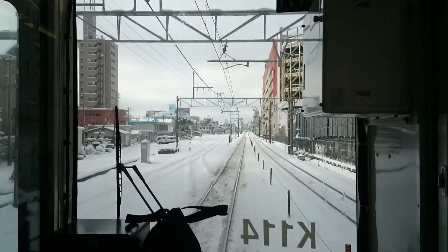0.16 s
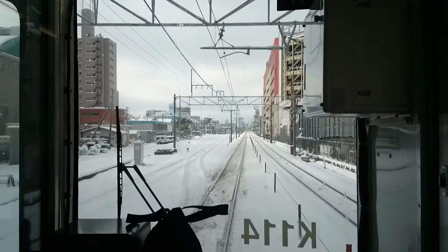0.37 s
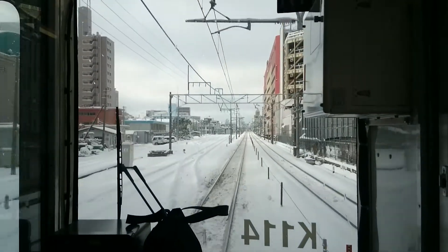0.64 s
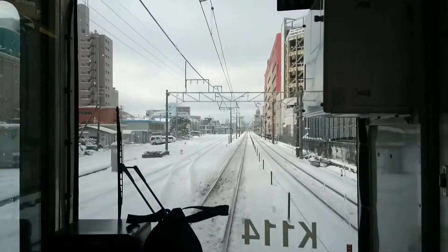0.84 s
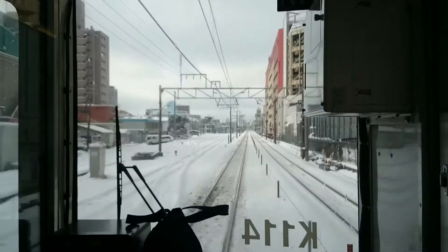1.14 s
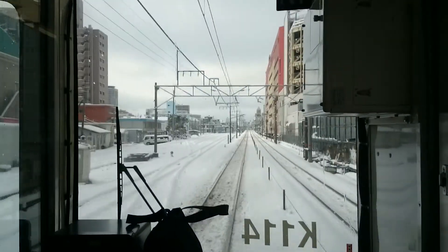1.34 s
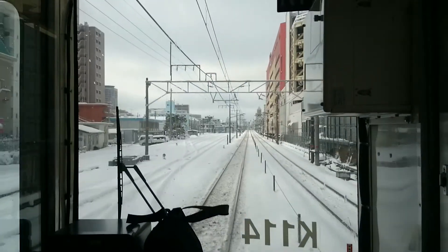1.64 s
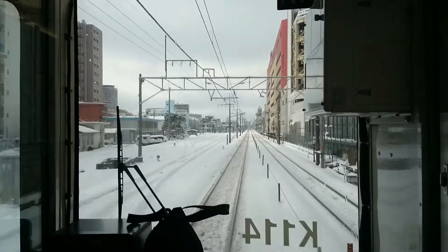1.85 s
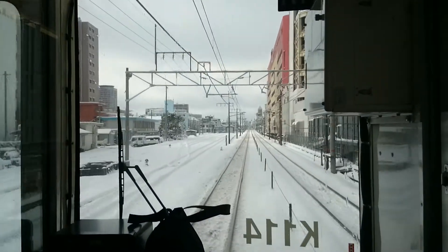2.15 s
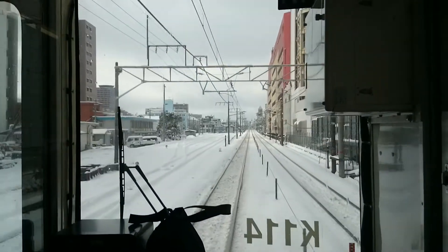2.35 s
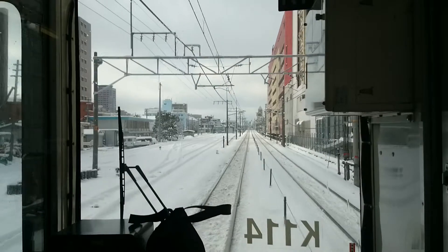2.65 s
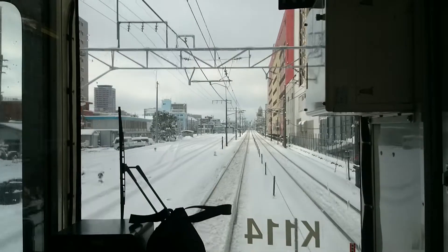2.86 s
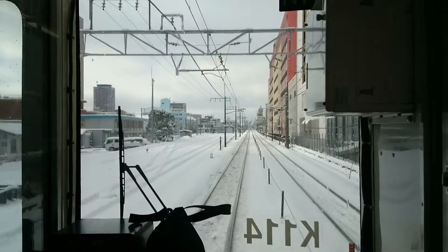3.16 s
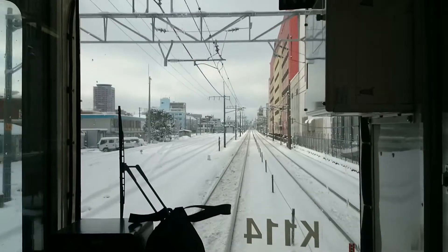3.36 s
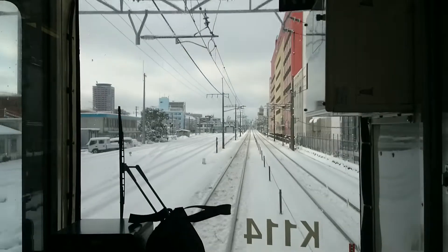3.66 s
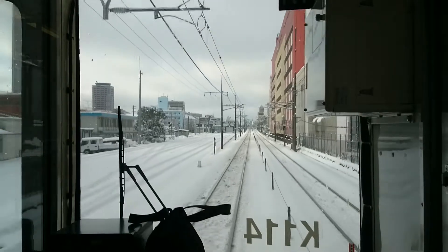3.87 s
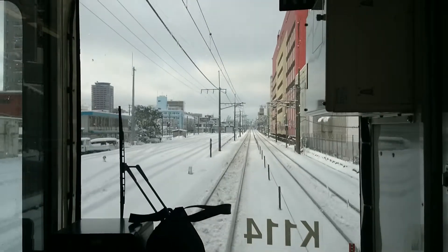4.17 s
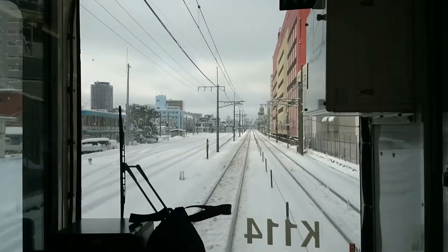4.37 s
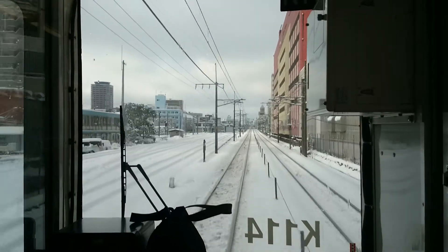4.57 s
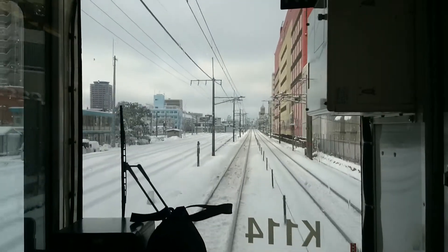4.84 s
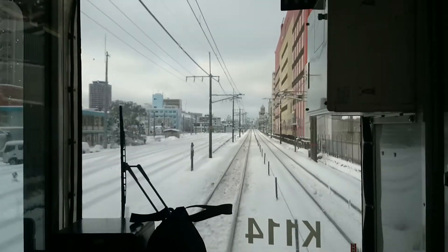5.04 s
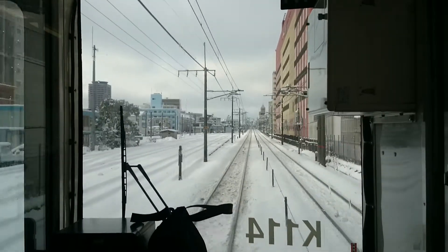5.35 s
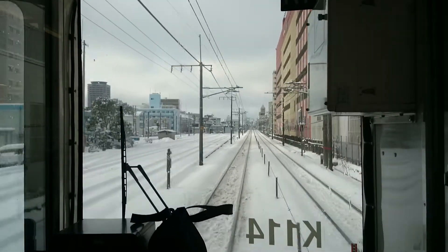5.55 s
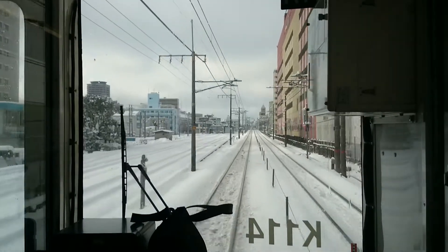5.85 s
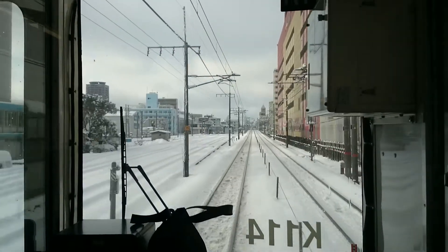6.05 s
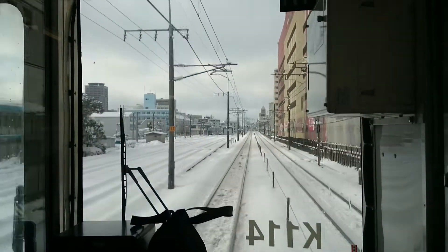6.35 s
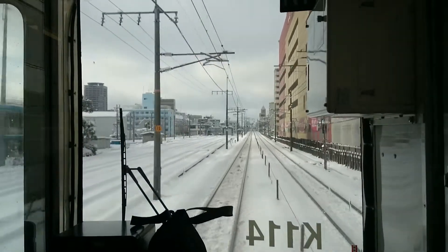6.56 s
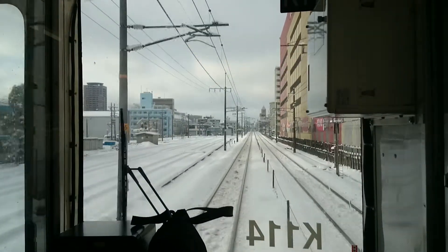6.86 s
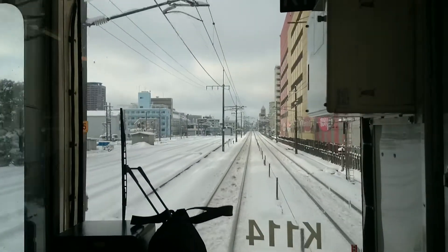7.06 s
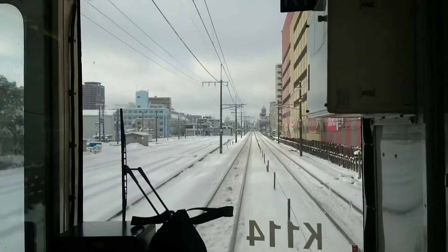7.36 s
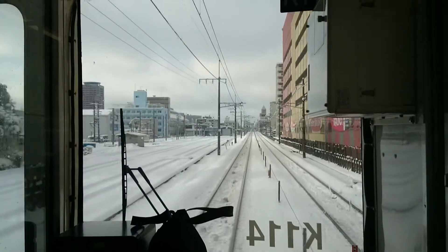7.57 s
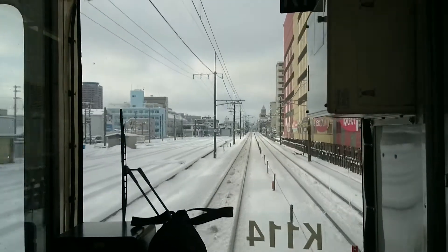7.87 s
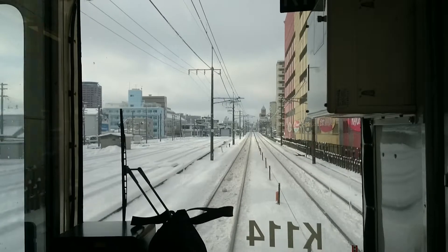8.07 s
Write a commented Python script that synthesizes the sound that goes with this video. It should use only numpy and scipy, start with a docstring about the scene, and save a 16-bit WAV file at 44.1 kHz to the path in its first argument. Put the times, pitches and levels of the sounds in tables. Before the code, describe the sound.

Inside the front of a moving electric train, low booming rumble and steady rolling noise, with irregular dull knocks and clacks from wheels crossing rail joints.

```python
"""A rumbling, knocking ride inside the front of an electric train on jointed, snowy track, in two ports.
A wavering slow sine bounces the car body and shaped noise booms in the cabin; rough rail drives noise
through floor and wheel resonances; axles over joints ring pitched floor modes and crack on the wheels.
Puffs and one swell of grainy hiss lean to the right; a few faint squeaks are short, wobbling sines."""
import sys
import numpy as np
from scipy import signal
from scipy.fft import rfft, irfft, next_fast_len
from scipy.io import wavfile
from scipy.ndimage import uniform_filter1d

SR = 44100
rng = np.random.default_rng(int(sys.argv[2]) if len(sys.argv) > 2 else 0)


def put_to_file(sound):
    """Save the sound as 16-bit audio at rate SR, in the file named by the first command-line argument."""
    columns = np.atleast_2d(sound).T  # one column per channel
    safe = np.clip(columns, -1, 1)
    whole_steps = np.round(safe * 32767)
    wavfile.write(sys.argv[1], SR, whole_steps.astype(np.int16))


def boost(x):
    """Linear amplitude factor 10**(x/20) for a level x in decibels (scalar or array-like)."""
    u = np.asarray(x, float) / 20
    return 10 ** u


N = 362061
T = np.arange(N) / SR
SIZE = next_fast_len(N + SR)
HZ = np.fft.rfftfreq(SIZE, 1 / SR)
SWELL_TOP_S = 2.945  # the long hiss swell reaches its top; the wheels sing louder around it

# Axles over joints and points. Each row: start in seconds, thud level in dB, thud pitch in Hz, hardness in dB.
KNOCKS = [(0.001, -20.5, 284, 10), (0.016, -24, 394, 0), (0.292, -43.5, 465, -4), (0.392, -41, 330, 15),
          (0.621, -40.5, 372, 3), (0.732, -37, 280, 1.5), (0.932, -38, 249, 9), (1.108, -42.5, 229, -11),
          (1.186, -37.5, 267, 3), (1.521, -30, 252, 3.5), (1.684, -20, 279, -7), (1.941, -26, 252, 1.5),
          (1.953, -30, 315, 3), (2.003, -31.5, 210, -5), (2.091, -28, 299, 0), (2.149, -30.5, 224, -9),
          (2.207, -34.5, 230, -5), (2.272, -30, 320, 9), (2.29, -34.5, 421, 0.5), (2.395, -36.5, 393, -3.5),
          (2.518, -37.5, 357, 7), (2.706, -37.5, 305, 7), (3.745, -30.5, 290, 2), (3.872, -29.5, 294, -2),
          (4.281, -24, 264, -8.5), (4.315, -30.5, 256, -2), (4.37, -33.5, 254, -10),
          (4.412, -22, 262, -5.5), (4.5, -36.5, 293, -5.5), (4.805, -42.5, 272, -1),
          (5.349, -30.5, 275, -11), (5.485, -36.5, 413, 6.5), (5.868, -32, 269, -12),
          (5.986, -33, 294, -15), (6.062, -21.5, 267, 12), (6.092, -31, 283, 7), (6.198, -17, 287.4, 11.5),
          (6.235, -25, 282, -7), (6.402, -33, 277, 6.5), (6.494, -33, 486, -2.5), (6.962, -28.5, 326, 1),
          (7.092, -33, 277, 0.5), (7.301, -35.5, 372, 1), (7.36, -37, 308, 9.5), (7.78, -39, 296, 7),
          (7.916, -29, 291, -5.5)]


def evened(x):
    """Scales to rms 1."""
    return x / np.sqrt(np.mean(abs(x) ** 2) + 1e-20)


def spectrum(points):
    """Interpolates a table over log frequency on the FFT grid."""
    hz, value = np.transpose(points)
    return np.interp(np.log(HZ + 1), np.log(hz + 1), value)


def curve(rows, column):
    """Interpolates one column of a control table, sample by sample."""
    rows = np.array(rows)
    return np.interp(T, rows[:, 0], rows[:, column])


def through(drive, response):
    """Filters the drive by a response scaled to unit noise gain."""
    return irfft(rfft(drive, SIZE) * evened(response), SIZE)[..., :N]


def bursts(starts_s, levels_db, t60_s, rise_s):
    """Envelope of events that rise fast and die exponentially."""
    out = np.zeros(N + SR)
    t = T[:SR // 2]
    shape = boost(-60 * t / t60_s) * (1 - np.exp(-t / rise_s))
    for start_s, level_db in zip(starts_s, levels_db):
        first = round(max(start_s, 0) * SR)
        out[first:first + len(t)] += boost(level_db) * shape
    return out[:N]


def body():
    """Wavering sine bounce and noise boom, jolted by joints; the vented left port loses slow pressure."""
    # Each row: time in seconds, bounce level in dB, boom level in dB.
    motion = [(0.0, -27, -17), (0.2, -28.5, -28.5), (0.71, -38, -33.5), (1.07, -19, -28), (1.32, -16, -27),
              (1.85, -26, -28.5), (2.0, -35, -23), (2.33, -23, -27), (2.75, -32, -32), (2.97, -25, -22),
              (3.45, -53, -26.5), (3.86, -18.5, -28.5), (4.35, -29, -33), (4.89, -19, -24.5),
              (5.44, -24.5, -27), (6.06, -24, -27.5), (6.3, -24, -23.5), (6.72, -27.5, -27.5),
              (7.29, -17.5, -24), (7.73, -24.5, -29.5), (8.21, -39, -25)]
    # Boom spectrum. Each row: frequency in Hz, level in dB.
    boom_shape = [(2, -4), (8, 1.5), (14, 3.5), (20, 0.5), (29, -9), (40, -12), (65, -18.5), (110, -27.5),
                  (170, -39.5), (300, -73.5), (900, -140)]
    bounce_hz, waver_share = 3.5, 0.076
    jolt_db, jolt_t60_s = -11.5, 0.34
    left_vent_hz = 45
    waver = uniform_filter1d(uniform_filter1d(rng.standard_normal(N), 9000), 9000)
    pitch_hz = bounce_hz * (1 + waver_share * evened(waver))
    bounce = np.sqrt(2) * np.sin(2 * np.pi * np.cumsum(pitch_hz) / SR)
    boom = evened(through(rng.standard_normal(N), boost(spectrum(boom_shape))))
    starts_s, thud_db = np.transpose(KNOCKS)[:2]
    jolts = bursts(starts_s, thud_db + jolt_db, jolt_t60_s, rise_s=0.037)
    pressure = boost(curve(motion, 1)) * bounce + (boost(curve(motion, 2)) + jolts) * boom
    right = rfft(pressure, SIZE)
    vent = 1j * HZ / (left_vent_hz + 1j * HZ)
    return irfft(np.array([vent * right, right]), SIZE)[:, :N]


def rail_lumps():
    """Small random bumps of the rail, each a soft decaying pulse, as one envelope of rms 1."""
    bumps_per_s, t60_s, rise_s = 90, 0.11, 0.011
    bumps = (rng.random(N) < bumps_per_s / SR) * np.minimum(rng.exponential(1, N), 2.5)
    t = T[:SR // 4]
    bump = boost(-60 * t / t60_s) * (1 - np.exp(-t / rise_s))
    return evened(signal.oaconvolve(bumps, bump)[:N])


def wheel_response():
    """Causal wheel and rail resonances, alternating in sign, over a broad rail spectrum."""
    # Wheel and rail modes. Each row: frequency in Hz, width in Hz, level in dB.
    wheel_modes = [(786.3, 35, 0), (1114, 46, 2), (1385, 40, -2.5), (1463, 31.6, 1), (1947.4, 38, -1.5),
                   (1971.5, 30.5, 3), (2052, 57, -7), (2660, 27, -1.5), (2816, 60, -5.5), (3330, 23, -6),
                   (3820, 90, -20), (4530, 31, -11), (5390, 76, -26)]
    # Broad rail sound. Each row: frequency in Hz, level in dB.
    rail_shape = [(500, -19.5), (900, -8.5), (1700, -11.5), (2400, -14.5), (3100, -18.5), (4100, -20.5),
                  (7000, -35.5), (16000, -42)]
    response = boost(spectrum(rail_shape)).astype(complex)
    for k, (hz, width_hz, db) in enumerate(wheel_modes):
        response += (-1) ** k * boost(db) / (1 + 2j * (HZ - hz) / width_hz)
    return response


def patchy(pair, spread_db):
    """Level wanders apart from band to band, in patches about 250 Hz by 90 ms, alike in both ports."""
    z = signal.stft(pair, nperseg=1024, noverlap=768)[2]
    field = uniform_filter1d(rng.standard_normal(z.shape[1:]), size=6, axis=0)
    field = evened(uniform_filter1d(field, size=16, axis=1))
    return signal.istft(z * evened(boost(spread_db * field)), nperseg=1024, noverlap=768)[1][:, :N]


def rolling_and_singing(noise, wheel):
    """Rail roughness drives noise through the floor, and in part through the wheel modes."""
    # Each row: time in seconds, rail roughness in dB.
    roughness = [(0.0, -42), (0.46, -46), (1.95, -42), (2.12, -37), (2.52, -47.5), (3.16, -46), (4.18, -45),
                 (4.34, -46.5), (4.6, -46.5), (5.51, -47.5), (5.9, -44), (6.72, -44), (7.25, -43.5),
                 (7.66, -44.5), (8.21, -44)]
    # Floor spectrum. Each row: frequency in Hz, level in dB.
    floor_shape = [(60, -36.5), (120, -10.5), (170, -9.5), (285, -3), (400, -3), (550, -6.5), (800, -14),
                   (1200, -25.5), (2500, -31), (5000, -60.5), (12000, -110)]
    floor_lump_db, wheel_lump_db = -8.5, -19.5
    sing_db, sing_at_rough_db, sing_follow = -51.5, -45.5, 0.6
    swell_sing_db, swell_sing_s = 5.5, 0.26
    lumps = rail_lumps()
    rough_db = curve(roughness, 1)
    rough = boost(rough_db) * evened(1 + boost(floor_lump_db) * lumps)
    level_db = sing_db + sing_follow * (rough_db - sing_at_rough_db)
    level_db += swell_sing_db * np.exp(-((T - SWELL_TOP_S) / swell_sing_s) ** 2)
    sing = boost(level_db) * evened(1 + boost(wheel_lump_db) * lumps)
    rolling = through(rough * noise[:2], boost(spectrum(floor_shape)))
    return patchy(rolling + through(sing * noise[2:], wheel), spread_db=1.7)


def thuds():
    """Each joint gives a soft blow and a dying shake that ring the floor at the pitch of that spot."""
    # Floor modes over the bogie. Each row: multiple of thud pitch, width in Hz, level in dB.
    floor_modes = [(.47, 47, -21.5), (.8, 48.8, -13.5), (1.005, 45, 9.5), (1.302, 51.7, 8.5),
                   (1.6, 77, 10.5), (2.048, 85.6, -7), (2.597, 119, -2.5)]
    upper_db, upper_follow = -12, 0.73  # harder joints raise the upper modes
    shake_t60_s = 0.34
    # share of clean blow: strong, soft joints thud cleanly, hard ones rattle
    clean_share, clean_at_db, clean_per_db, clean_per_hard_db = .38, -30, .017, -.016
    out = np.zeros((2, N + SR))
    t = T[:SR // 2]
    for start_s, db, hz, hard_db in KNOCKS:
        ring = np.zeros(len(t))
        for ratio, width_hz, mode_db in floor_modes:
            if ratio > 1.2:
                mode_db = mode_db + upper_db + upper_follow * hard_db
            decay = np.exp(-np.pi * width_hz * t) * width_hz
            ring += boost(mode_db) * decay * np.sin(2 * np.pi * ratio * hz * t)
        # the springs smooth the blow to a few swings
        swings = np.exp(-((t - .011) / 0.012) ** 2) * np.cos(2 * np.pi * hz * t)
        blow = signal.fftconvolve(swings, ring)[:len(t)]
        shake = boost(-60 * t / shake_t60_s) * (1 - np.exp(-t / 0.004)) * rng.standard_normal((2, len(t)))
        shake = signal.fftconvolve(shake, ring[None] / np.linalg.norm(ring), axes=1)[:, :len(t)]
        clean = clean_share + clean_per_db * (db - clean_at_db) + clean_per_hard_db * hard_db
        clean = np.clip(clean, 0, 1)
        first = round(start_s * SR)
        out[:, first:first + len(t)] += boost(db) * (clean * blow / abs(blow).max() + (1 - clean) * shake)
    return out[:, SR // 100:][:, :N]  # all 10 ms earlier, as the swings build up first


def clacks(noise, wheel):
    """Each joint strikes the wheel modes with one sharp steel contact and a burst of noise."""
    # A blow excites the wheel unlike rolling. Each row: frequency in Hz, level in dB.
    clack_shape = [(600, -1), (1500, 2.5), (3000, -3), (6000, 0), (12000, 5)]
    ring_db, ring_t60_s = -18, .2
    crack_s = .00016  # width of the steel contact
    starts_s, thud_db, _, hard_db = np.transpose(KNOCKS)
    level_db = thud_db + ring_db + hard_db
    struck = bursts(starts_s - .004, level_db, ring_t60_s, rise_s=0.026)
    crack = np.zeros(N)
    crack[np.round((starts_s + .003) * SR).astype(int)] = 1.18 * boost(level_db)
    contact = np.exp(-((T[:60] - 4 * crack_s) / crack_s) ** 2)
    crack = signal.oaconvolve(crack, contact)[:N]
    return through(crack + struck * noise, wheel * boost(spectrum(clack_shape)))


def ports(a, b):
    """Two ports hear partly the same field, with a lead and a lean that depend on pitch."""
    # Each row: frequency in Hz, likeness of the ports from 0 to 1.
    likeness = [(60, 0.11), (200, 0.95), (350, 0.78), (640, 0.62), (1160, 0.33), (2090, 0.35), (3780, 0.32),
                (8000, .3)]
    # Each row: frequency in Hz, lead of the left port in radians.
    left_lead = [(0, 0), (260, 0.3), (860, -0.1), (1210, 0.8), (1640, 3.3), (2070, 2.9), (2840, 6.6),
                 (3360, 6.4), (3700, 5.7), (3960, 2.7)]
    # Each row: frequency in Hz, left over right in dB.
    left_lean = [(60, -10), (95, -0.5), (150, -1.5), (240, 1), (380, 0), (600, 5.5), (950, 3), (1510, 5),
                 (2390, 1.5), (3780, -0.5)]
    a, b = rfft(a, SIZE), rfft(b, SIZE)
    same = np.clip(spectrum(likeness), 0, 1)
    lean = boost(spectrum(left_lean) / 2)
    shared = same * a * np.exp(-1j * spectrum(left_lead))
    right = (shared + np.sqrt(1 - same ** 2) * b) / lean
    return irfft(np.array([a * lean, right]), SIZE)[:, :N]


def wheels():
    """Rolling, thuds and clacks pass the cab walls, which hold back the treble, to both ports."""
    # Each row: frequency in Hz, wall gain in dB.
    wall_gain = [(3900, 0), (4400, -7), (7000, -8), (16000, -22.5)]
    noise = rng.standard_normal((4, N))
    wheel = wheel_response()
    field = rolling_and_singing(noise, wheel) + thuds() + clacks(noise[2:], wheel)
    inside = irfft(rfft(field, SIZE) * boost(spectrum(wall_gain)), SIZE)[:, :N]
    return ports(*inside)


def hiss():
    """Fine grainy noise, nearer the right port: sharp puffs and one swell over a faint bed."""
    # Each row: start in seconds, level in dB.
    puffs = [(0.008, -44.5), (0.103, -60.5), (.19, -70), (0.299, -62), (0.3203, -63), (.425, -71),
             (0.5068, -75), (0.5815, -63.5), (1.2207, -65), (1.247, -61), (1.29, -77.5), (1.3764, -64.5),
             (1.958, -72), (2.069, -64.5), (2.1161, -75), (2.3162, -77), (2.38, -78), (3.6292, -75),
             (3.713, -78), (4.43, -80), (6.0741, -73.5), (6.1909, -72), (7.2535, -78), (7.35, -75),
             (7.45, -76)]
    # Hiss spectrum. Each row: frequency in Hz, level in dB.
    hiss_shape = [(2000, -8), (4500, 5), (6000, -1), (8000, -9), (10000, -10.5), (12500, -12), (13600, -19),
                  (16000, -33.5)]
    # Each row: frequency in Hz, right over left in dB.
    right_lean = [(4000, 3.5), (8000, 6), (13000, 16)]
    bed_db, puff_t60_s, grain_spread_db = -84, 0.22, 2.6
    swell_db, rise_s, hold_s, fall_s = -70.5, .1, 0.14, .035
    before_s = np.minimum(T - SWELL_TOP_S, 0)
    after_s = np.maximum(T - SWELL_TOP_S - hold_s, 0)
    swell = np.exp(-(before_s / rise_s) ** 2 - (after_s / fall_s) ** 2)
    level = boost(bed_db) + boost(swell_db) * swell
    level += bursts(*np.transpose(puffs), puff_t60_s, rise_s=.0008)
    grains = boost(grain_spread_db * rng.standard_normal(N // 64 + 1).repeat(64)[:N])
    a, b = rng.standard_normal((2, N)) * grains
    pan = boost(spectrum(right_lean) / 2)
    pair = np.array([0.7 * b + 0.41 * a, b])
    return through(level * pair, boost(spectrum(hiss_shape)) * np.array([1 / pan, pan]))


def squeaks():
    """Brief faint running-gear tones with soft ends; pitch wobbles and rises 4 percent over each."""
    # Each row: start in seconds, length in seconds, middle pitch in Hz, level in dB, left over right in dB.
    squeak_rows = [(.27, 0.064, 510, -39.5, 1), (.41, 0.13, 3620, -64.5, -2), (.86, 0.072, 2540, -54, 2)]
    out = np.zeros((2, N))
    for start_s, length_s, hz, db, pan_db in squeak_rows:
        t = T[:round(length_s * SR)]
        wobble = 0.3 * uniform_filter1d(rng.standard_normal(len(t)), 150)
        pitch_hz = hz * (1 + wobble + .04 * (t / length_s - .5))
        tone = np.sin(2 * np.pi * np.cumsum(pitch_hz) / SR) * np.sin(np.pi * t / length_s)
        gains = boost(db + np.array([[pan_db / 2], [-pan_db / 2]]))
        first = round(start_s * SR)
        out[:, first:first + len(t)] += gains * tone
    return out


def scene():
    """Body, wheels, hiss and squeaks together."""
    return body() + wheels() + hiss() + squeaks()


def low_pass(x):
    """Removes everything above the highest recorded frequency."""
    return signal.sosfilt(signal.butter(12, 15450, fs=SR, output="sos"), x)


def record(dry):
    """Delivers the finished two-port mix."""
    return low_pass(dry)


dry = scene()
out = record(dry)
put_to_file(out)
```